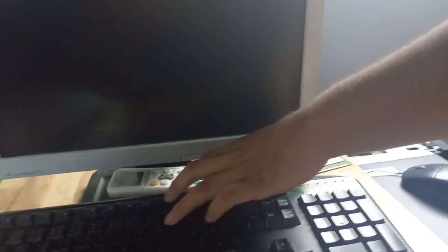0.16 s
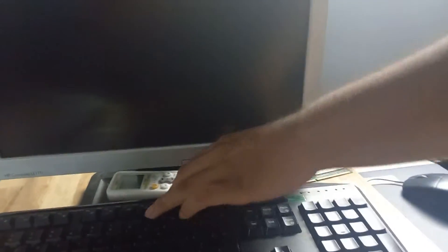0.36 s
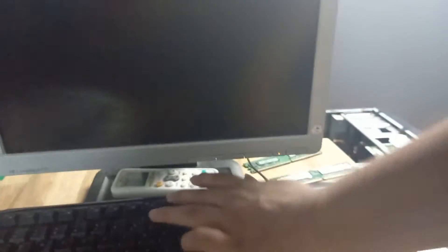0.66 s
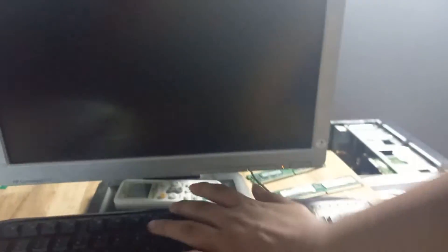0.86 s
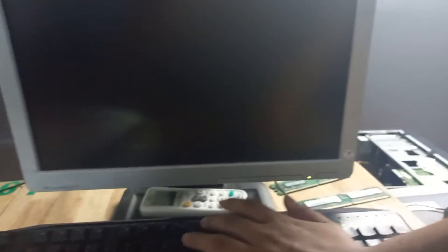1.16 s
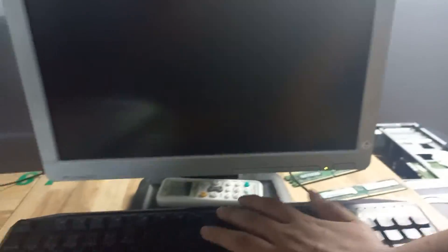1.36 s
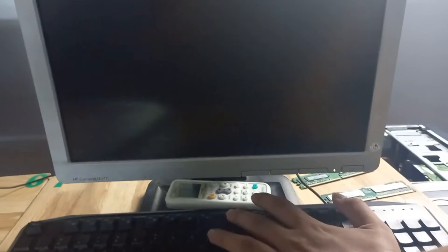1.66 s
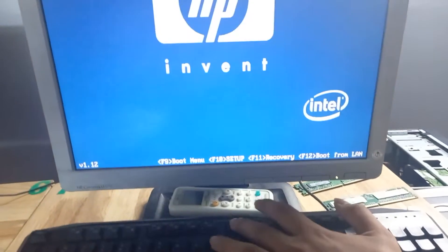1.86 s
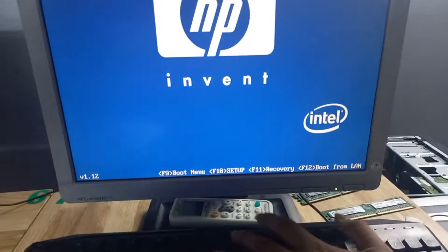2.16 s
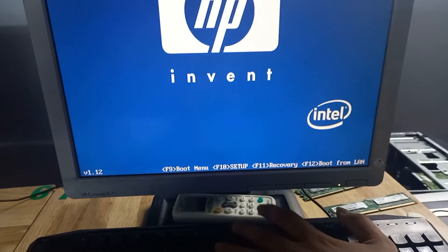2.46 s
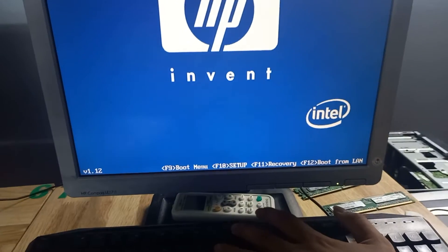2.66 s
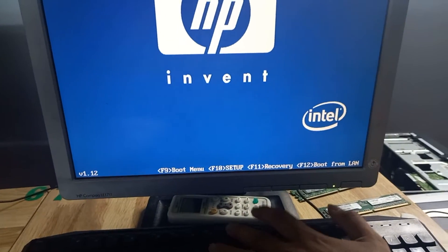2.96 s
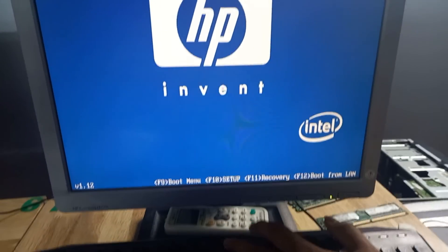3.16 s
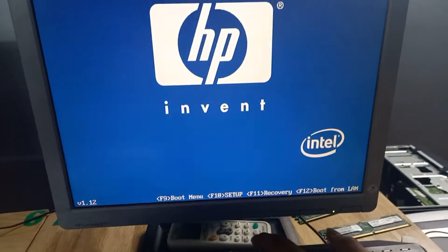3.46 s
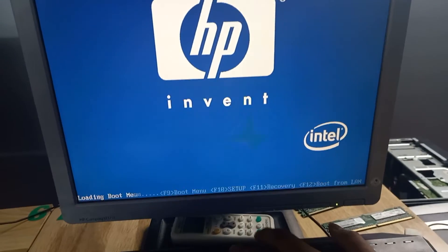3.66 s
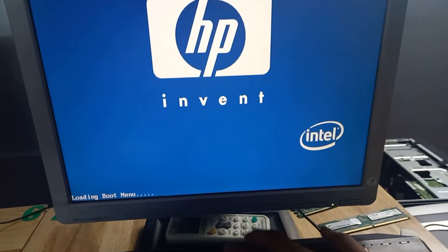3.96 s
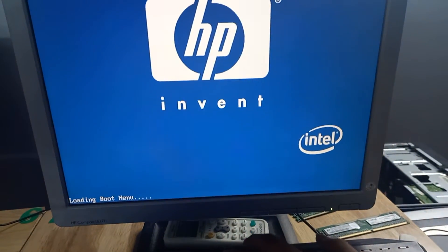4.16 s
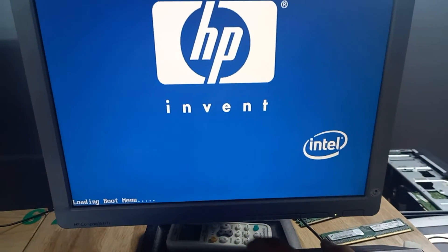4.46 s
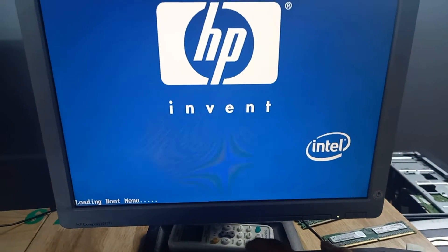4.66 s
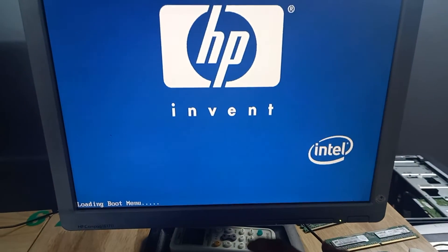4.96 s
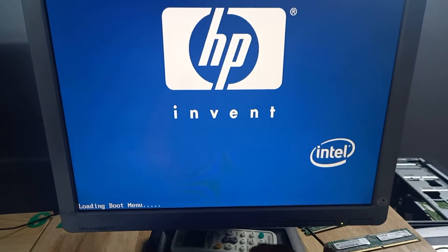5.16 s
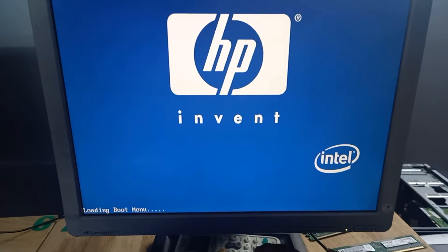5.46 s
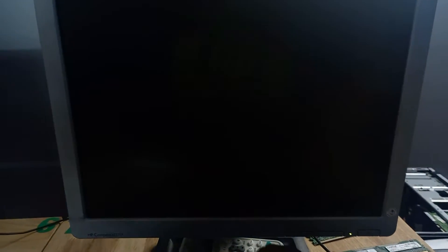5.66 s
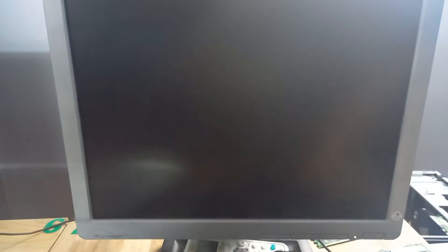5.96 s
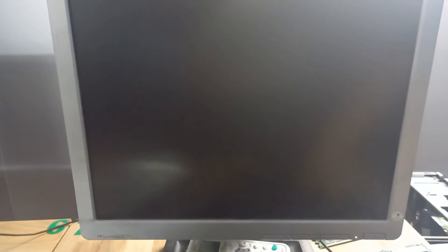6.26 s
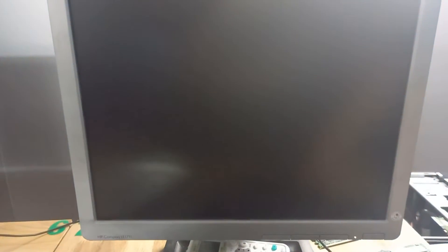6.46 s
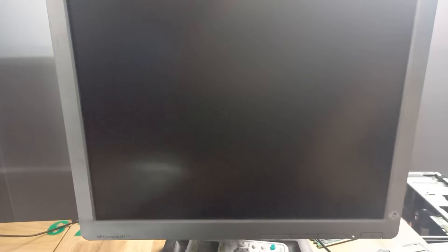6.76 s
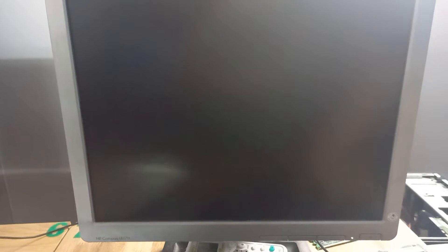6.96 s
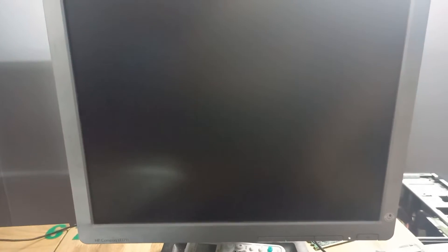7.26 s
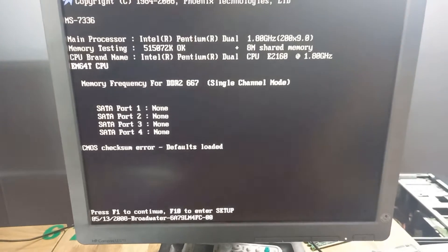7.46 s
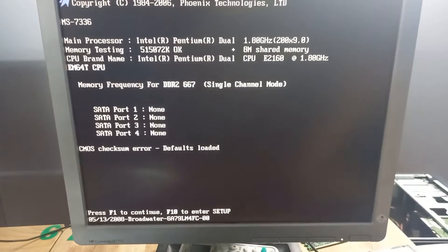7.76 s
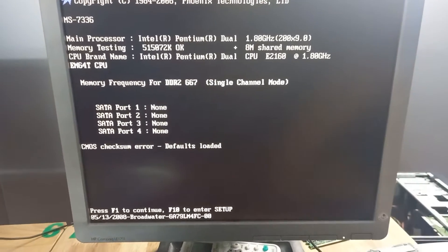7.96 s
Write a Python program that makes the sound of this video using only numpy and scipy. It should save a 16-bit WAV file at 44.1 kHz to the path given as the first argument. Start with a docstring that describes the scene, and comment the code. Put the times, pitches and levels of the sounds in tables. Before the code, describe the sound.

Close to an open desktop computer on a desk, fans hum low under rushing air. Fingers knock and tick on a plastic keyboard, mostly in the first second and a half, with short grainy slides. From about three seconds the rumble deepens and the treble dulls, most on the right. A low drone later swells and drifts upward, a thin whine shows near seven seconds, and a few quiet clicks end it. Hand-held stereo microphones with soft hiss.

```python
"""Open desktop computer on a desk

Heard through a hand-held pair of microphones 16 cm apart. Two fans and a drone are stacks of
wavering sines, over steady mains and motor tones; rumble, rushing air and hiss are shaped noise.
The rumble deepens and swells, a thin whine comes forward, and the treble dulls, most on the right.
A hand on the keyboard adds noise-burst ticks, knocks of decaying sines and short grainy slides."""
import sys
import numpy as np
from scipy import signal
from scipy.fft import rfft, irfft
from scipy.io import wavfile
from scipy.ndimage import uniform_filter1d

SR = 44100
rng = np.random.default_rng(int(sys.argv[2]) if len(sys.argv) > 2 else 0)


def master(y):
    """Save y as 16-bit WAV."""
    cut = np.clip(np.atleast_2d(y).T, -1, 1)
    pcm = np.round(cut * 32767)  # scale
    wavfile.write(sys.argv[1], SR, pcm.astype(np.int16))


N = 358091
TIME = np.arange(N) / SR
BINS = np.fft.rfftfreq(N, 1 / SR)
SOUND_SPEED = 343  # m/s
# The air flow builds once; rumble and hum follow it: start [s], time taken [s]
BUILD_S, BUILD_TIME_S = 2.62, 2.9

# Main fan: (time [s], level [dB])
MAIN_FAN = [(0, -43.5), (1.5, -36.5), (2.5, -39.5), (3.1, -35.5), (4.2, -38), (5.2, -40), (8.12, -49)]
# Its tones: (multiple of the shaft rate, relative level [dB])
MAIN_ORDERS = [(1, -0.5), (2, -7), (3, -18.5), (4, -15), (5, -20), (6, -10.5), (9, -21.5), (15, -27)]
MAIN_HZ = 60.65


def main_fan():
    """The large fan holds one speed; its shaft orders waver in level and phase."""
    return rotor(MAIN_HZ, *curves(MAIN_FAN), MAIN_ORDERS, flutter=0.16, slip=0.24)


# Small fan: (time [s], speed [turns/s])
SMALL_SPEED = [(0, 150.6), (.9, 151), (1.5, 152), (3, 151.3), (4.6, 150.9), (5.5, 148.5), (6.4, 147.2),
               (6.74, 146.5), (6.88, 145), (7.02, 144.4), (7.08, 143.4), (7.25, 142.8), (7.75, 142.5),
               (8.12, 141.5)]
# Its blade tones: (time [s], level [dB])
BLADE_LEVEL = [(0, -45), (.25, -45), (.7, -55.5), (1.5, -44), (1.9, -55.5), (2.6, -53), (3.25, -44.5),
               (3.55, -54.5), (3.8, -41.5), (4.4, -49), (5.4, -56), (8.12, -60)]
# Blade tones: (multiple of the shaft rate, relative level [dB])
SMALL_ORDERS = [(2, -6.5), (3, -2), (4, -13.5)]
# Resonances that lift the whine: (centre [Hz], standard deviation [Hz], gain [dB])
WHINE_RESONANCES = [(1747.5, 4.5, 16), (1708, 17, 20)]
WHINE_ORDER, WHINE_DB = 12, -73  # multiple of the shaft rate, level away from any resonance


def small_fan():
    """Blade tones and a high whine follow one shaft, which eases off; resonances lift the whine."""
    hz, = curves(SMALL_SPEED)
    whine_hz = WHINE_ORDER * hz
    whine_db = WHINE_DB + sum(
        gain_db * np.exp(-((whine_hz - centre) / width) ** 2 / 2)
        for centre, width, gain_db in WHINE_RESONANCES)
    whine = amp(whine_db) * tone(whine_hz, flutter=0.05, slip=0.08)
    blades = rotor(hz, *curves(BLADE_LEVEL), SMALL_ORDERS, flutter=0.13, slip=0.2)
    return blades + whine


# Low drone: (time [s], pitch [Hz], level [dB])
DRONE = [(4.3, 65, -50), (5.15, 67.7, -32.5), (5.45, 68.5, -32.5), (5.8, 68.5, -41), (6.18, 69, -29.5),
         (6.38, 69, -36), (6.62, 69.4, -26), (6.9, 70, -33), (7.05, 75.5, -30), (7.55, 76, -25.5),
         (7.8, 79, -33), (8.12, 80, -37)]
# Its tones: (multiple of the drone's pitch, relative level [dB])
DRONE_ORDERS = [(1, -2), (2, -11), (3, -21), (5, -22.5)]


def drone():
    """A low stack of harmonics that swells and drifts upward."""
    return rotor(*curves(DRONE), DRONE_ORDERS, flutter=0.2, slip=0.22)


# Air flow rumble: (frequency [Hz], light density [dB per Hz, relative], deep density [same])
RUMBLE = [(20, -31, -28), (32, -25, -25), (44, -29, -15), (55, -24, -10), (61, -7, -10), (86, -3.5, -1),
          (127, -8.5, -1), (157, -12.5, -5.5), (219, -13, -8), (322, -17, -14), (380, -16.5, -15.5),
          (492, -21, -21.5), (557, -32, -24.5), (990, -34, -47)]
# Light level [dB], its creep before the build ends it [dB/s], gain once deep [dB], later easing [dB/s]
RUMBLE_DB, CREEP_DB_PER_S, DEEP_GAIN_DB, EASE_DB_PER_S = -32.5, 0.42, 4, 0.5


def rumble():
    """Low turbulence crosses from a light to a deep noise spectrum as the air flow builds."""
    depth = ramp(BUILD_S, BUILD_TIME_S)
    creep_db = CREEP_DB_PER_S * np.minimum(TIME, BUILD_S)
    ease_db = EASE_DB_PER_S * np.maximum(TIME - BUILD_S - BUILD_TIME_S, 0)
    level_db = RUMBLE_DB + creep_db + DEEP_GAIN_DB * depth - ease_db
    light = diffuse(colour(RUMBLE, BINS, axis=1))
    deep = diffuse(colour(RUMBLE, BINS, axis=2))
    churn = (np.sqrt(1 - depth ** 2) * light + depth * deep) * amp(level_db)
    low_pass = signal.butter(4, 900, fs=SR, output="sos")
    return signal.sosfilt(low_pass, churn)


# Air through blades and grilles: (frequency [Hz], density [dB per Hz, relative, before the bass cut])
RUSH = [(400, -6.5), (600, 3.5), (860, 1), (1030, -7), (1400, -5), (1850, -5.5), (2550, -12), (3000, -16.5),
        (4500, -22), (5600, -24), (6500, -29.5), (9400, -28.5), (15500, -43)]
# Rushing air before gusts: (time [s], level [dB])
RUSH_LEVEL = [(0, -46), (.12, -46), (.5, -46.5), (.93, -47.5), (1.15, -46.5), (1.4, -46), (2.7, -46),
              (3.0, -44.5), (3.34, -45.5), (3.48, -45.5), (3.8, -45), (4.6, -45), (5.6, -48), (6.7, -48),
              (7.4, -47.5), (7.85, -49.5), (8.12, -49.5)]
GUST_DB, GUST_HZ = 0.82, 24  # rms depth, upper rate


def rush():
    """The brighter, gusting air at the blade tips and grilles."""
    bass_cut = BINS ** 2 / (BINS ** 2 + 350 ** 2)
    air = flecked(diffuse(colour(RUSH, BINS) * bass_cut))
    return air * amp(curves(RUSH_LEVEL)[0] + GUST_DB * drift(GUST_HZ))


def flecked(x, patchy_db=2.5, centre_hz=2630.0, spread=1.0, patch_hz=296.0, patch_s=0.019):
    """Brief patches of the upper middle flare and fade at random, each side on its own."""
    hz, t, z = signal.stft(x, SR, nperseg=512, noverlap=384)
    field = rng.standard_normal(z.shape)
    # Smooth the random field along frequency, then along time
    for axis, width in ((1, patch_hz / hz[1]), (2, patch_s / t[1])):
        steps = np.arange(field.shape[axis]) - field.shape[axis] // 2
        bell = np.exp(-(2 * steps / width) ** 2)
        bell = np.expand_dims(bell, (0, 3 - axis))
        field = signal.fftconvolve(field, bell, "same", axes=axis)
    reach = np.exp(-(np.log((hz + 1) / centre_hz) / spread) ** 2 / 2)[:, None]
    patches = amp(patchy_db * reach * unit(field))
    return signal.istft(z * patches, SR, nperseg=512, noverlap=384)[1][:, :N]


# Passing bands of soft noise:
# (time [s], half width to 1/e [s], frequency [Hz], half width to 1/e [Hz], level [dB])
NOISE_BANDS = [(3.68, 0.8, 95.6, 15, -33), (0.89, 0.3, 850, 140, -52), (3.33, 0.27, 830, 130, -49),
               (4.05, 0.41, 495, 63, -51), (1.02, .2, 8200, 900, -71), (6.1, 0.51, 1700, 220, -61),
               (0.38, .3, 1400, 300, -56), (4.73, 0.76, 218, 30, -43)]


def noise_bands():
    """Bands of soft noise, low to high, that come forward and recede."""
    return sum(amp(db) * bump(s, length) * diffuse(bump(hz, width, BINS))
               for s, length, hz, width, db in NOISE_BANDS)


# Mains, motors and the case they shake:
# (frequency [Hz], level while rumble is light [dB], level once it is deep [dB])
HUM = [(48, -47.5, -46.5), (99.8, -36.5, -37.5), (147.5, -54, -52), (191.5, -60, -46), (239.8, -43, -44.5),
       (287.8, -54, -52), (302.5, -54, -50), (408.4, -59, -57), (545, -74, -66), (601, -63, -68),
       (789, -66, -67), (822.5, -61.5, -59.3), (13738, -88, -88)]


def hum():
    """Steady tones of the running machine; their balance shifts as the air flow builds."""
    depth = ramp(BUILD_S, BUILD_TIME_S)
    return sum(amp(light_db + (deep_db - light_db) * depth) * tone(hz, flutter=0.04, slip=0.06)
               for hz, light_db, deep_db in HUM)


# Small level wavers of the low sound: (time [s], half width to 1/e [s], gain [dB])
WAVERS = [(.2, 0.14, 2), (.5, 0.013, -14), (1.2, 0.2, -0.5), (2.08, 0.031, 3), (2.21, 0.061, -1),
          (3.9, 1, -0.9), (5.9, 0.036, 2.5), (7.83, .03, -1.5)]


def waver():
    """Gain shared by the fans, drone, rumble and hum: their level wavers slightly."""
    return amp(sum(db * bump(s, width) for s, width, db in WAVERS))


# Fingers on keys and plastic: (time [s], peak level before pan and the common lift [dB],
# left over right [dB], brightness [dB per octave])
KNOCKS = [(0.2818, -34.5, -1, -6), (.634, -44, 3, -3), (.945, -40, -2, 8), (.993, -41, -1, 3),
          (1.1825, -40, -1, 8), (1.345, -42.5, -2, 11), (4.973, -45, 6, 5.5), (6.995, -51, 7, -3),
          (7.194, -59, 10, 0), (7.359, -53, 8, 0), (7.56, -52, 9, 5), (7.618, -46, 10, 0)]
# What the keyboard rings with: (frequency [Hz], relative level [dB], time to fall 60 dB [s])
KEY_MODES = [(1280, 2, 0.02), (1520, 7, .016), (2100, -1, .015), (2500, -2, .022), (2830, -9, .035),
             (3070, -5.5, 0.053), (4200, -15, .008), (5600, -20, .006)]


def knocks(lift_db=3.5):
    """Each knock rings the keyboard's modes; a brighter contact favours the high ones."""
    out, t = np.zeros((2, N)), np.arange(SR // 10) / SR
    for s, db, pan_db, bright_db in KNOCKS:
        ring = sum(amp(mode_db + bright_db * np.log2(hz) - 60 * t / t60) * np.sin(2 * np.pi * hz * t)
                   for hz, mode_db, t60 in KEY_MODES)
        knock = amp(db + lift_db) * sides(pan_db) * ring / np.abs(ring).max()
        place(out, s, knock)
    return out


# Clearest plastic ticks: (time [s], level before envelope, pan and common lift [dB], pitch ratio)
TICKS = [(.1146, -53, .9), (.2802, -51, 1), (.5895, -47, .92), (.9437, -52, .95), (1.139, -42, 1),
         (1.1844, -50, 1), (1.29, -54, 1), (2.1859, -52, 1), (3.031, -51, 1), (3.1811, -49, 1.05),
         (3.8575, -48, 1), (4.972, -48, 1), (5.5377, -49, 1), (6.2133, -52, 1.1), (6.5818, -49, 1),
         (6.8159, -51, 1), (6.9032, -53, 1), (6.994, -47, .95), (7.194, -49, .95), (7.29, -46, 1.1),
         (7.3586, -50, .95), (7.4399, -47, 1.05), (7.5589, -45, 1), (7.6165, -47, 1.05)]
# Fainter random ticks: number, mean level on the same scale [dB], spread [dB], pitch ratio spread
FAINT_COUNT, FAINT_DB, FAINT_SPREAD_DB, TICK_PITCH_SPREAD = 36, -55.5, 2, 0.06
# Depth limit of the right side's dulling, also the lean of ticks and slides to the left:
# (time [s], level [dB])
RIGHT_DULLNESS = [(0, 9), (1.18, 2.5), (1.45, 16), (2, 24), (2.7, 10), (3.2, 19), (3.9, 29), (5.5, 31),
                  (8.12, 33)]


def tick_rows():
    """Clear and faint ticks as (time [s], level [dB], left over right [dB], pitch ratio)."""
    faint = [(rng.random() * TIME[-1],
              FAINT_DB + FAINT_SPREAD_DB * rng.standard_normal(),
              1 + TICK_PITCH_SPREAD * rng.standard_normal()) for _ in range(FAINT_COUNT)]
    return [(s, db, curves(RIGHT_DULLNESS, s)[0], pitch) for s, db, pitch in [*TICKS, *faint]]


# Plastic contact, for ticks and slides: (frequency [Hz], density [dB per Hz, relative])
TICK_COLOUR = [(1500, -22), (3000, -7), (5000, -4), (8000, 4), (10000, 4), (11500, 9), (13500, 0),
               (15500, -4)]


def ticks(decay=0.0014, ring=0.02, ring_db=-15.5, lift_db=0.6, rise=0.0009):
    """Each contact is a short crack of noise with a weak rattle of plastic; times in seconds."""
    out, t = np.zeros((2, N)), np.arange(SR // 10) / SR
    hz = np.fft.rfftfreq(len(t), 1 / SR)
    fall = np.exp(-t / decay) + amp(ring_db) * np.exp(-t / ring)
    shape = fall * (1 - np.exp(-t / rise))
    for s, db, pan_db, pitch in tick_rows():
        noise = rfft(rng.standard_normal((2, len(t))))
        grain = unit(irfft(noise * colour(TICK_COLOUR, hz / pitch), len(t)))
        place(out, s, amp(db + lift_db) * sides(pan_db) * shape * grain)
    return out


# Fingertips on plastic: (time [s], half width to 1/e [s], level before pan and grain [dB])
SLIDES = [(.585, .03, -68), (.96, .06, -69), (1.07, .04, -68), (1.175, .035, -65), (7.31, 0.019, -70),
          (7.61, .028, -66)]


def slides(grain_db=4.0):
    """Skin catching and slipping on plastic: short grainy hisses."""
    level = sum(amp(db) * bump(s, width) * sides(curves(RIGHT_DULLNESS, s)[0])
                for s, width, db in SLIDES)
    return diffuse(colour(TICK_COLOUR, BINS)) * level * amp(grain_db * drift(90))


# Microphone hiss: (frequency [Hz], density [dB per Hz, relative])
HISS = [(1000, 0), (5000, 4), (6500, 1), (9400, 0.5), (10500, -1), (12800, -0.5), (14000, -8.5),
        (15500, -12.5)]


def hiss(level_db=-58.5):
    """Even noise of the two microphones, independent on each side."""
    noise = rfft(rng.standard_normal((2, N)))
    return amp(level_db) * unit(irfft(noise * colour(HISS, BINS), N))


DROP_S, DROP_TIME_S = 1.17, 0.33  # quick drop of the treble edge: start, time taken
SINK_S, SINK_TIME_S, SINK_SHAPE = 3.1, 1.63, 1.8  # slow sinking: start, time constant, exponent


def treble_edge(t, open_hz, held_hz, final_hz):
    """Where the dulling begins: a quick drop, a hold, then a long sinking that levels out."""
    dropped_hz = open_hz + (held_hz - open_hz) * ramp(DROP_S, DROP_TIME_S, t)
    remaining = np.exp(-(np.maximum(t - SINK_S, 0) / SINK_TIME_S) ** SINK_SHAPE)
    return final_hz + (dropped_hz - final_hz) * remaining


# Treble edge, left row then right row: (open [Hz], held [Hz], final [Hz])
EDGES = [(16000, 5100, 1620), (9200, 6300, 386)]
# The very top on the right dulls less: (frequency [Hz], share of the depth limit)
DULL_SHARE = [(8000, 0.92), (12500, 0.68), (15000, 0.25)]
# Steepness of the edge [dB/kHz]: open, held, and sunk on (left, right)
OPEN_DB_PER_KHZ, HELD_DB_PER_KHZ, SUNK_DB_PER_KHZ = 8, 11, (20.5, 9)
# Steep wall on the right after the drop, with a lift just under it
WALL_HZ, WALL_DB_PER_KHZ, LIFT_HZ, LIFT_WIDTH_HZ, LIFT_DB = 6800, 45, 5960, 2160, 2.5


def dulled(x, knee_hz=196.0, left_depth_db=14.5, open_hz=3760.0, opening_hz=265.0, ragged_hz=151.0):
    """Treble dulls above a falling, ragged edge; on the left it stays open above open_hz."""
    hz, t, z = signal.stft(x, SR, nperseg=1024)
    hz = hz[:, None]
    drop, sink = ramp(DROP_S, DROP_TIME_S, t), ramp(SINK_S, SINK_TIME_S, t)
    grain = uniform_filter1d(rng.standard_normal(z.shape[1:]), size=4, axis=0)
    grain = uniform_filter1d(grain, size=4, axis=1)
    ragged = hz + ragged_hz * unit(grain)
    losses_db = []
    for edge_row, sunk in zip(EDGES, SUNK_DB_PER_KHZ):
        slope = OPEN_DB_PER_KHZ + (HELD_DB_PER_KHZ - OPEN_DB_PER_KHZ) * drop
        slope = slope + (sunk - HELD_DB_PER_KHZ) * sink
        # Soft knee: no loss below the edge, a straight slope above it
        above_hz = knee_hz * np.logaddexp(0, (ragged - treble_edge(t, *edge_row)) / knee_hz)
        losses_db.append(slope * above_hz / 1000)
    left, right = losses_db
    left = np.minimum(left, left_depth_db) * (1 - np.tanh((hz - open_hz) / opening_hz)) / 2
    wall = WALL_DB_PER_KHZ * np.maximum(hz - WALL_HZ, 0) / 1000
    wall = wall - LIFT_DB * bump(LIFT_HZ, LIFT_WIDTH_HZ, hz)
    right_limit = curves(RIGHT_DULLNESS, t)[0] * np.interp(hz, *np.transpose(DULL_SHARE))
    right = np.minimum(right + wall * drop, right_limit)
    return signal.istft(z * amp(-np.array([left, right])), SR, nperseg=1024)[1][:, :N]


def rotor(hz, db, orders, flutter, slip):
    """A stack of shaft orders; higher ones blur more."""
    return amp(db) * sum(amp(order_db) * tone(k * hz, flutter, slip * np.sqrt(k))
                         for k, order_db in orders)


def tone(hz, flutter, slip):
    """A sine that flutters in level and slips in phase [rad] as the air around it churns."""
    phase = 2 * np.pi * (np.cumsum(hz * np.ones(N)) / SR + rng.random()) + slip * drift(5.3)
    return np.sqrt(2) * np.sin(phase) * (1 + flutter * drift(4.3))


def diffuse(gain, spacing=0.16, likeness=0.94):
    """Noise from all sides at two microphones, spacing in metres: most alike in the bass."""
    same = likeness * np.sinc(2 * BINS * spacing / SOUND_SPEED)
    a, b = rfft(rng.standard_normal((2, N)))
    pair = np.array([a, same * a + np.sqrt(1 - same ** 2) * b])
    return unit(irfft(pair * gain, N))


def drift(rate):
    """Random wandering of rms 1, up to about the given rate a second."""
    return unit(irfft(rfft(rng.standard_normal(N)) / (1 + (BINS / rate) ** 4), N))


def colour(points, hz, axis=1):
    """Gain of one column of a spectrum table, joined along log frequency."""
    table = np.transpose(points)
    return amp(np.interp(np.log(hz + 1), np.log(table[0] + 1), table[axis]))


def curves(rows, t=TIME):
    """The columns of a timed table, joined by straight lines."""
    s, *columns = np.transpose(rows)
    return [np.interp(t, s, c) for c in columns]


def ramp(start, length, t=TIME):
    """Rises in a straight line from 0 to 1."""
    return np.clip((t - start) / length, 0, 1)


def bump(centre, width, x=TIME):
    """A smooth hill of height 1."""
    return np.exp(-((x - centre) / width) ** 2)


def sides(pan_db):
    """Left and right gains for a left-right difference, at constant power."""
    return unit(amp([[pan_db / 2], [-pan_db / 2]]))


def place(out, s, sound):
    """Adds a short sound at a time in seconds, cut off at the end."""
    part = out[:, round(s * SR):][:, :sound.shape[1]]
    part += sound[:, :part.shape[1]]


def amp(db):
    """Decibels to gain."""
    return 10 ** (np.asarray(db) / 20)


def unit(x):
    """Scales to rms 1."""
    return x / np.sqrt(np.mean(x ** 2) + 1e-20)


def scene():
    """Air, fan tones, hum and hiss dull together; the hand's ticks, knocks and slides stay crisp."""
    machine = waver() * (main_fan() + small_fan() + drone() + rumble() + hum())
    soft_noise = rush() + noise_bands()
    hand = knocks() + ticks() + slides()
    return dulled(machine + soft_noise + hiss()) + hand


def record(dry, balance_db=-0.07, cutoff_hz=15750):
    """The right microphone is very slightly more sensitive; both are band limited."""
    band_limit = signal.firwin(511, cutoff_hz, window=("kaiser", 9), fs=SR)
    balanced = dry * amp([[balance_db], [-balance_db]])
    return signal.oaconvolve(balanced, band_limit[None], "same", axes=1)


dry = scene()
out = record(dry)
master(out)
```